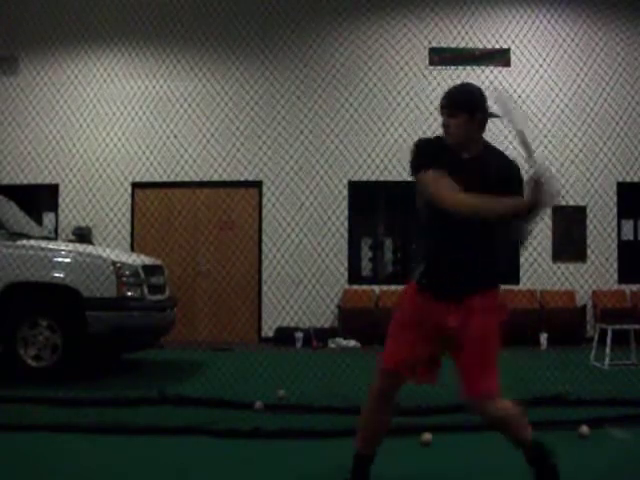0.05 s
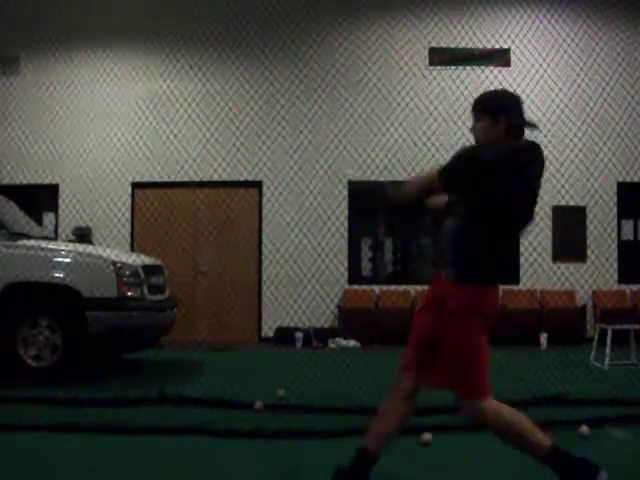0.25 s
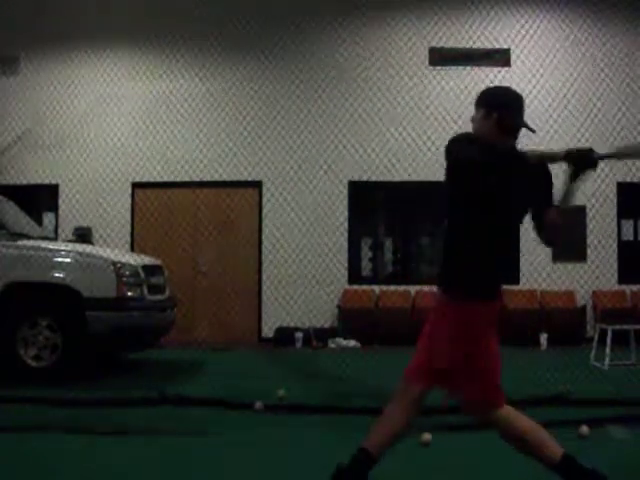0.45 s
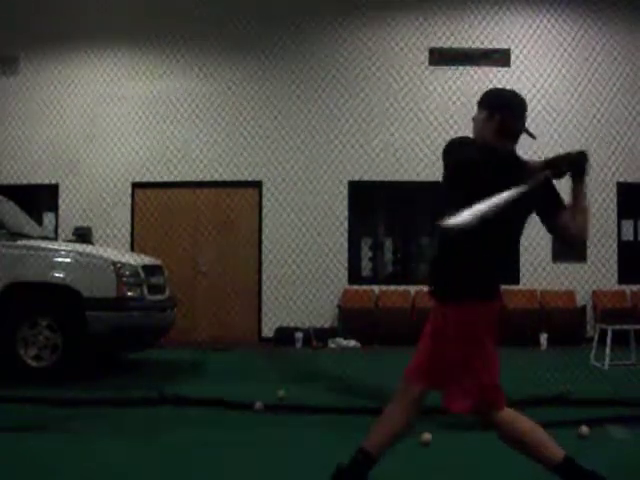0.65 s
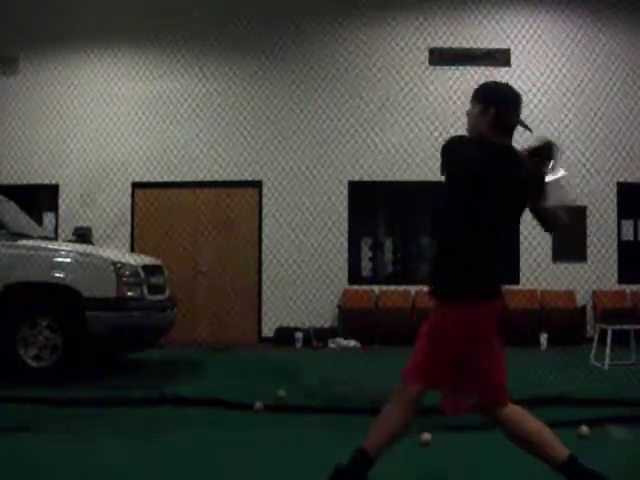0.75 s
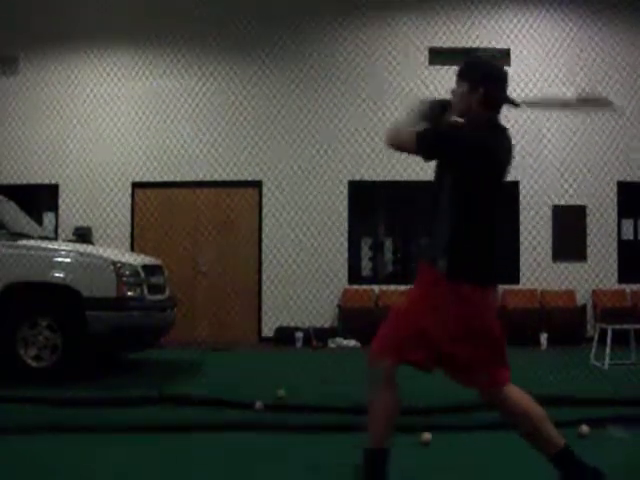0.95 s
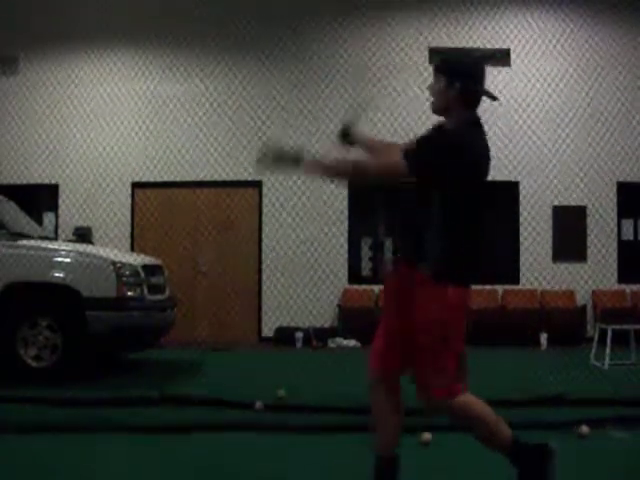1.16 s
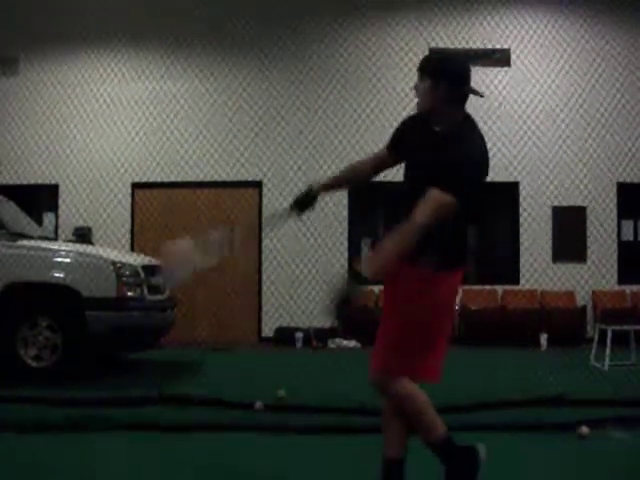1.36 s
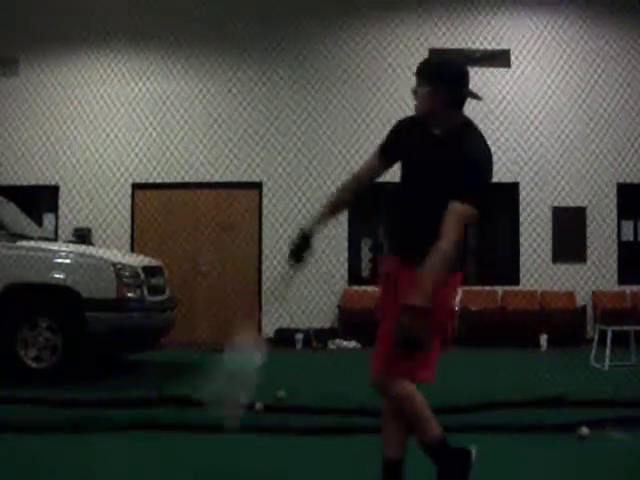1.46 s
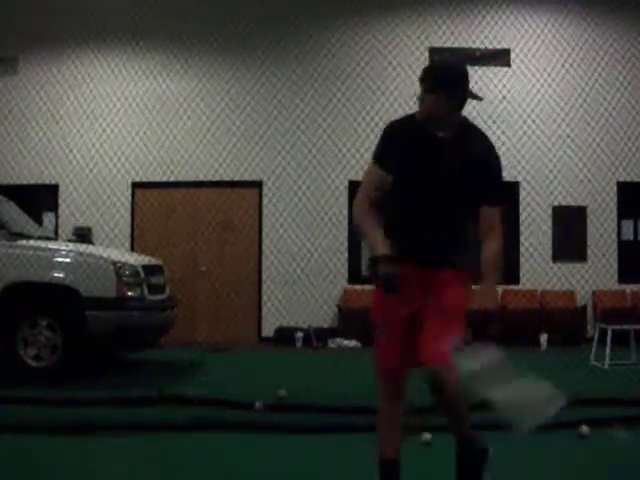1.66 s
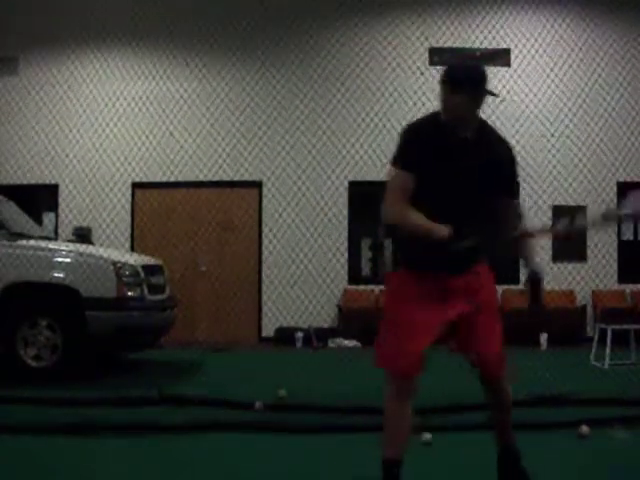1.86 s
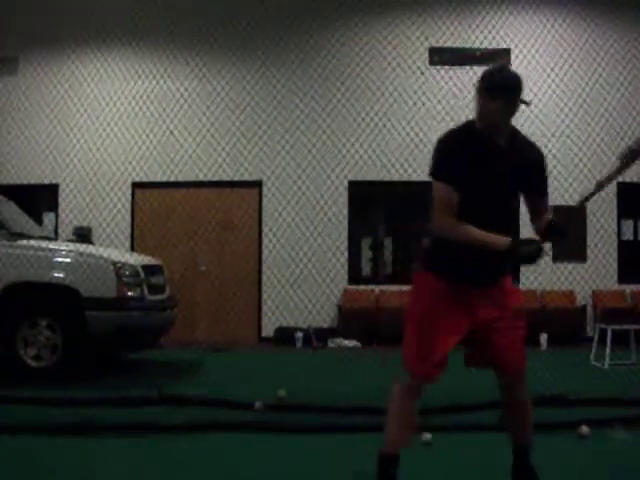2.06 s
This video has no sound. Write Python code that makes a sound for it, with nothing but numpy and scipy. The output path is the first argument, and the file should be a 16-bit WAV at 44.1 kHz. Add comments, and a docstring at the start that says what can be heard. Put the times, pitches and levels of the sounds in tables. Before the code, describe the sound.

One loud metal baseball bat ping echoes indoors, followed by a dull thud.

```python
"""A bat hit in a batting hall.

An aluminium bat pings against a ball in a large, hard-walled hall. The swing shifts its one strong
note down toward the microphone and up or down toward the walls, so the hall rings with a band of pitches.
The ball thuds at the far end and bounces, and the batter steps back, over rumble and mains hum.
The ping overloads a small camera, which turns its volume down and slowly brings it back."""
import sys
import numpy as np
from scipy import signal
from scipy.fft import rfft, irfft
from scipy.io import wavfile

SR = 44100
rng = np.random.default_rng(int(sys.argv[2]) if len(sys.argv) > 2 else 0)


def int16_out(signal):
    """Quantize to a 16-bit WAV file."""
    q = np.round(np.clip(np.atleast_2d(signal).T, -1, 1) * 32767)
    wavfile.write(sys.argv[1], SR, q.astype(np.int16))


N = 92610
T = np.arange(N) / SR
HIT_S = 0.2113


def amp(db):
    """Turns decibels into a number to multiply by."""
    return 10 ** (np.asarray(db) / 20)


def noise(points):
    """Noise of average power 1; (pitch_hz, level_db) points say which pitches are stronger."""
    hz, db = np.transpose(points)
    freqs = np.fft.rfftfreq(N, 1 / SR)
    gains = amp(np.interp(np.log(freqs + 1), np.log(hz), db))
    shaped = irfft(rfft(rng.standard_normal(N)) * gains, N)
    return shaped / np.sqrt(np.mean(shaped ** 2) + 1e-20)


def envelope(start_s, rise_s, hold_s, fade_s):
    """Rises from start_s; from hold_s after the start, it drops 60 dB every fade_s."""
    rise = np.clip((T - start_s) / rise_s, 0, 1)
    return rise * amp(-60 * np.maximum(T - start_s - hold_s, 0) / fade_s)


def lag(x, seconds):
    """Follows x sluggishly, smoothing out quick changes."""
    kept = np.exp(-1 / (seconds * SR))
    return signal.lfilter([1 - kept], [1, -kept], x)


def bat():
    """The hit cracks, bat and ball shake briefly, and the bat's note arrives direct and off the walls."""
    # tone of the crack: pitch_hz, level_db
    crack_tone = [(100, -13.5), (390, 3.5), (660, -12.5), (1050, 3.5), (1330, -2.5), (1630, 2),
                  (2400, -2.5), (4000, -19.5), (5500, -17)]
    # brief vibrations of bat and ball: pitch_hz, level_db, fade_s
    vibrations = [(390, 18, 0.023), (1051, 23, 0.02), (1249, 10.5, .13), (1414, 12.5, 0.11),
                  (1630, 24, 0.023), (2522, 0.5, 0.42)]
    # the note as the swing shifts it, direct then echoes:
    # start_s, pitch_hz, level_db, rise_s, hold_s, fade_s
    pings = [(0.214, 1883, 26.5, 0.0035, 0.034, 0.054), (0.274, 2102, 14.5, 0.0041, 0.022, 0.1),
             (0.426, 2044, 10, 0.0072, .02, 0.17), (1.03, 2053, -16, 0.017, 0.099, 0.54),
             (1.323, 2095, -20, .008, 0.022, 0.095)]
    out = amp(21) * noise(crack_tone) * envelope(HIT_S, rise_s=0.0001, hold_s=0.0029, fade_s=0.015)
    for hz, db, fade_s in vibrations:
        out += amp(db) * np.sin(2 * np.pi * hz * (T - HIT_S)) * envelope(HIT_S, 0.001, 0, fade_s)
    for start_s, hz, db, rise_s, hold_s, fade_s in pings:
        note = np.sin(2 * np.pi * hz * (T - start_s))
        out += amp(db) * note * envelope(start_s, rise_s, hold_s, fade_s)
    return out


def hall():
    """Hard walls scatter the crack into a quick splash and a long wash, and keep the note ringing."""
    # tone of the crack's first echoes: pitch_hz, level_db
    splash_tone = [(200, -9.5), (700, -3.5), (1500, -8), (2500, 11), (3100, -5.5), (5200, -0.5),
                   (5800, -13.5)]
    # tone of the crack's long echo: pitch_hz, level_db
    wash_tone = [(200, -17.5), (500, -22.5), (950, -5), (1450, -8), (1750, 4.5), (2250, 0.5), (2620, -1.5),
                 (3000, -15.5), (4300, -18.5), (5500, -29.5)]
    # the note spread into a band by the swing, strongest at both ends: pitch_hz, level_db
    ring_tone = [(1600, -46.5), (1835, -19.5), (1878, 2), (1935, -0.5), (1965, -11.5), (2020, -4),
                 (2046, 2.5), (2070, -6), (2098, 5), (2145, -23.5), (2300, -51)]
    splash = amp(2) * noise(splash_tone) * envelope(HIT_S, rise_s=0.017, hold_s=0.033, fade_s=0.26)
    wash = amp(-9.5) * noise(wash_tone) * envelope(HIT_S, rise_s=0.02, hold_s=0, fade_s=2.173)
    ring = amp(7) * noise(ring_tone) * envelope(HIT_S + 0.032, rise_s=0.016, hold_s=0, fade_s=2.13)
    return splash + wash + ring


def thuds():
    """Ball and feet land with a low, quickly dying wobble and a soft slap; the hall answers dully."""
    # the ball's landing, echoes and bounces, then footsteps:
    # start_s, level_db, pitch_hz, rise_s, slap_db (compared with the wobble)
    blows = [(1.305, -6, 265, 0.0014, -12), (1.3135, -19.5, 300, 0.0019, -14),
             (1.3182, -21, 770, .003, -12.5), (1.3252, -9.5, 269, 0.0019, -21),
             (1.331, -23.5, 330, 0.0012, -19.5), (1.336, -18, 220, .002, -15.5),
             (1.42, -23.5, 230, 0.0052, -14.5), (1.449, -28, 240, 0.0023, -17.5),
             (1.488, -24, 220, 0.0037, -23), (1.538, -31, 200, 0.006, -19.5),
             (1.832, -21.5, 50, 0.0044, -35), (1.913, -25, 60, 0.0041, -34),
             (1.923, -28.5, 320, 0.0024, -17), (1.987, -19.5, 220, 0.0022, -20),
             (2.008, -25, 202, 0.0019, -21)]
    # tone of the slap: pitch_hz, level_db
    slap_tone = [(200, -3.5), (700, 12.5), (1300, -1.5), (2500, -22.5), (5500, -28.5)]
    out, slap = np.zeros(N), noise(slap_tone)
    for start_s, db, hz, rise_s, slap_db in blows:
        age = np.maximum(T - start_s, 0)
        swell = (age / rise_s) ** 2 * np.exp(2 * (1 - age / rise_s))
        out += amp(db) * swell * (np.sin(2 * np.pi * hz * age) + amp(slap_db) * slap)
    dull = signal.lfilter(*signal.butter(1, 222, fs=SR), out)  # softens everything above 222 Hz
    tail = rng.standard_normal(N) * envelope(0.0046, rise_s=0.0042, hold_s=0, fade_s=1.42)
    echo = signal.fftconvolve(dull, tail / np.linalg.norm(tail))[:N]
    return out + amp(-3.5) * echo


def rushes():
    """Short swells of noise as the batter moves and the ball brushes the net."""
    # air, cloth, netting and shoes: middle_s, half_length_s, level_db, pitch_hz, width_octaves
    swells = [(0.106, 0.058, -43.5, 1720, 0.47), (0.106, 0.037, -45.5, 356, 1.1),
              (0.195, 0.025, -19, 61.5, 0.62), (0.203, 0.033, -32, 232, 1.88), (1.165, 0.03, -30, 55, 0.54),
              (1.194, 0.034, -40.5, 320, 1.4), (1.325, 0.062, -37.5, 900, 1), (1.337, .035, -53, 3440, .5),
              (1.418, 0.08, -44.5, 1000, 1), (1.64, 0.023, -55.5, 3300, .05),
              (2.02, 0.03, -54, 3400, 0.051), (2.029, 0.036, -53.5, 3770, 0.67),
              (2.071, 0.021, -43.5, 1010, 1.02)]
    out, freqs = np.zeros(N), np.geomspace(15, SR / 2, num=200)
    for middle_s, half_length_s, db, hz, octaves in swells:
        band_db = -10 * np.log10(np.e) * (np.log2(freqs / hz) / octaves) ** 2  # a bell curve around hz
        swell = np.exp(-((T - middle_s) / half_length_s) ** 2)
        out += amp(db) * noise(np.c_[freqs, band_db]) * swell
    return out


def background():
    """The ventilation rumbles, and the mains power hums under a faint, thin whine."""
    # tone of the ventilation: pitch_hz, level_db
    rumble_tone = [(15, -1.5), (35, -1), (65, -5), (95, -15.5), (200, -20.5), (350, -27.5), (700, -37.5),
                   (1300, -37), (2000, -32), (3000, -46.5), (5400, -50)]
    # steady notes of the hum and whine: pitch_hz, level_db
    hum_notes = [(59.8, -40), (120, -39.5), (240, -58), (716, -62), (5420, -72), (5588, -79)]
    hum = sum(amp(db) * np.sqrt(2) * np.sin(2 * np.pi * (hz * T + rng.random())) for hz, db in hum_notes)
    return amp(-33) * noise(rumble_tone) + hum


def scene():
    """Everything at one microphone."""
    return (bat() + hall() + thuds() + rushes() + background())[None]


def gain_control(x, block=64):
    """Turns the volume down within milliseconds of a loud peak, then brings it back ever faster."""
    limit_db, deepest_cut_db = -0.5, 26.5
    first_second_db, recovery_curve = 33, 1.66  # how quickly the volume comes back
    peaks = abs(x[:N // block * block]).reshape(-1, block).max(1)
    times = (np.arange(len(peaks)) + 0.5) * block / SR
    over_db = np.clip(20 * np.log10(peaks + 1e-9) - limit_db, 0, deepest_cut_db)
    age = times[:, None] - times
    recovered_db = first_second_db * abs(age) ** recovery_curve
    cut_db = np.maximum((over_db - recovered_db) * (age >= 0), 0).max(1)  # the deepest cut left wins
    return x * amp(-lag(np.interp(T, times, cut_db), seconds=0.0017))


def record(dry):
    """The camera turns the ping down, chops off the peaks that are still too big, and loses treble."""
    ceiling, overshoot_ceiling = 0.76, 0.78
    treble_hz, top_hz = 5650, 15800
    x = gain_control(dry[0])
    # overload pushes the wave off centre, then it settles back
    drift = 0.57 * lag(1.0 * (abs(x) > ceiling), seconds=0.061)
    x = x + drift - lag(drift, seconds=0.032)
    # the peaks are chopped at a quarter of the sample rate
    treble_filter = signal.firwin(161, treble_hz, window=("kaiser", 8), fs=SR)
    coarse = signal.resample_poly(x, 1, 4, window=treble_filter)
    coarse = np.clip(coarse, -ceiling, ceiling)
    x = signal.resample_poly(coarse, 4, 1, window=treble_filter)[:N]
    x = np.clip(x, -overshoot_ceiling, overshoot_ceiling)
    top_filter = signal.firwin(511, top_hz, window=("kaiser", 9), fs=SR)
    return signal.oaconvolve(x, top_filter, "same")[None]


dry = scene()
out = record(dry)
int16_out(out)
```